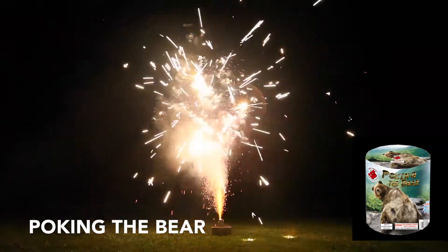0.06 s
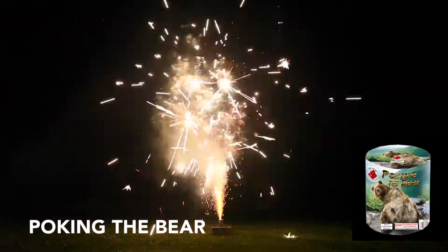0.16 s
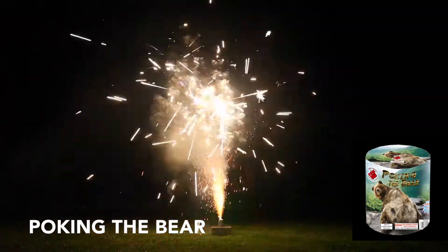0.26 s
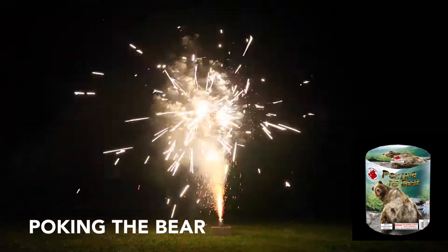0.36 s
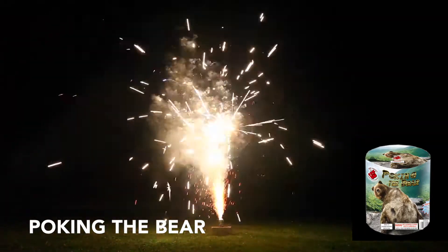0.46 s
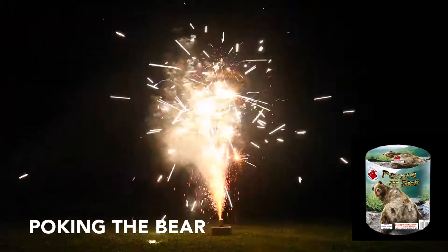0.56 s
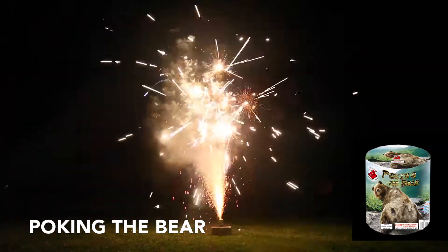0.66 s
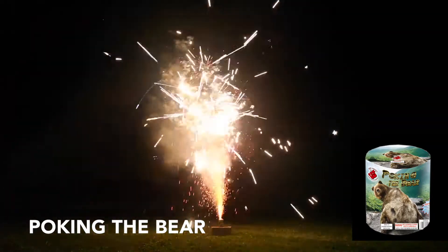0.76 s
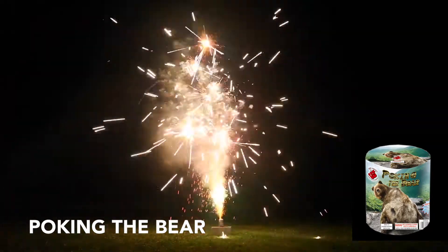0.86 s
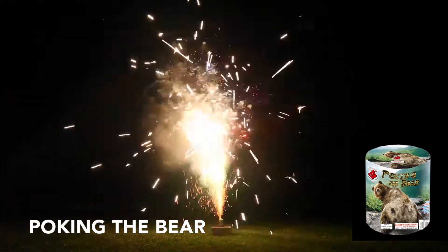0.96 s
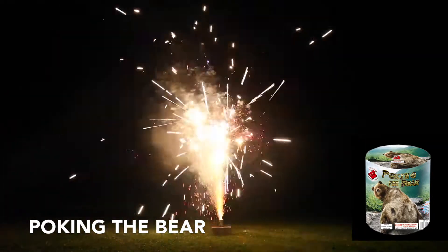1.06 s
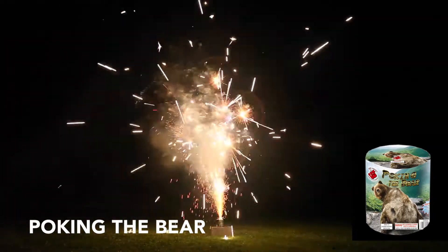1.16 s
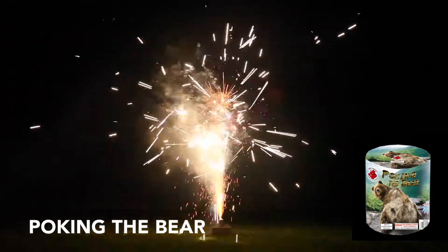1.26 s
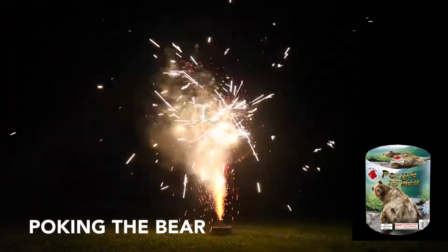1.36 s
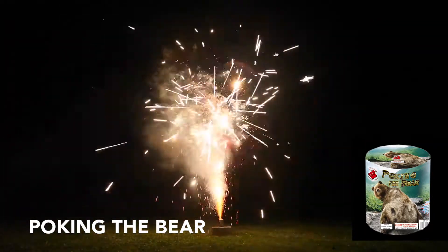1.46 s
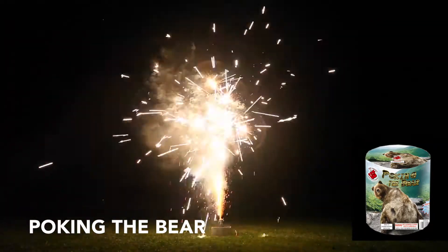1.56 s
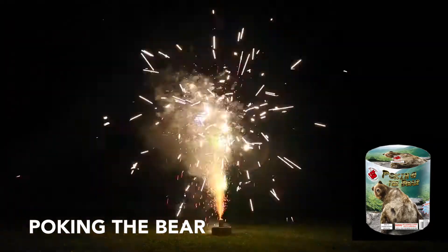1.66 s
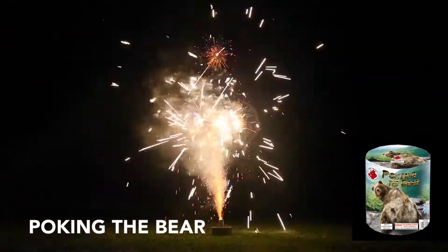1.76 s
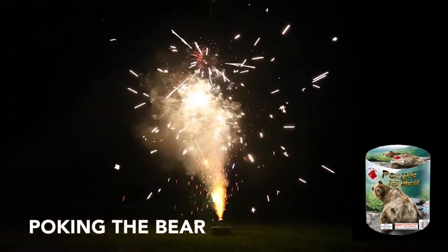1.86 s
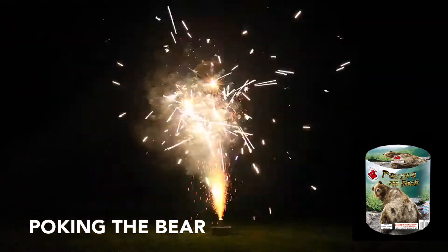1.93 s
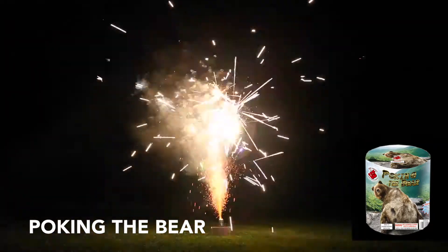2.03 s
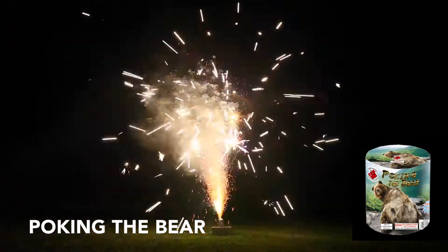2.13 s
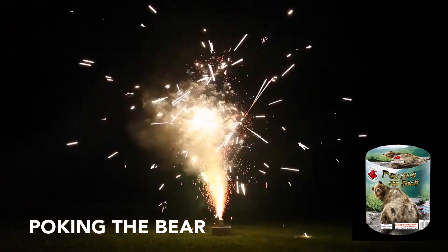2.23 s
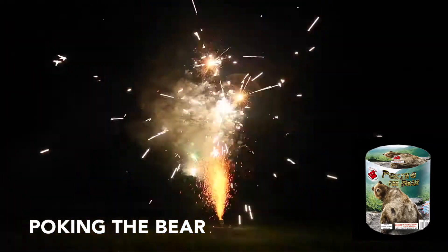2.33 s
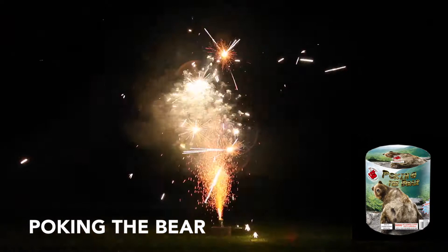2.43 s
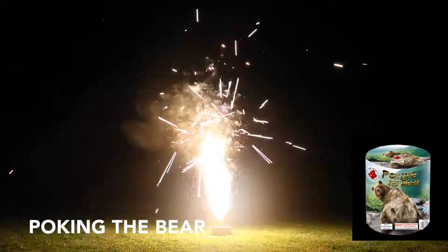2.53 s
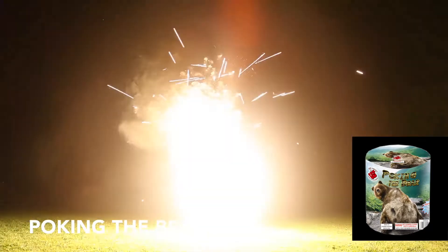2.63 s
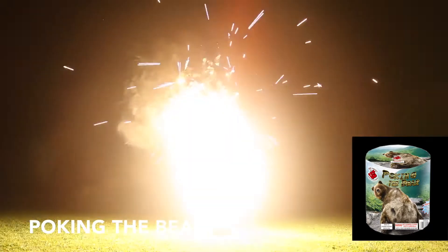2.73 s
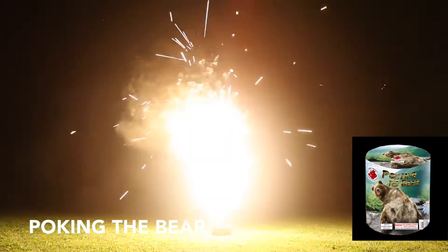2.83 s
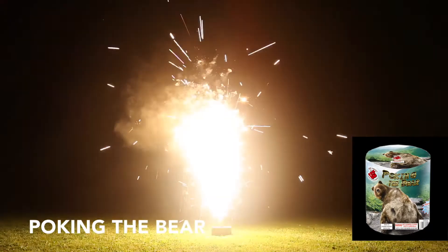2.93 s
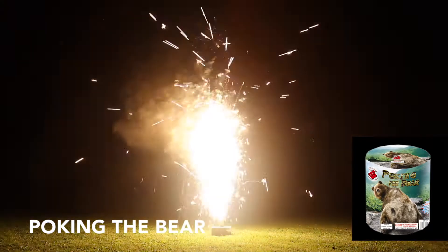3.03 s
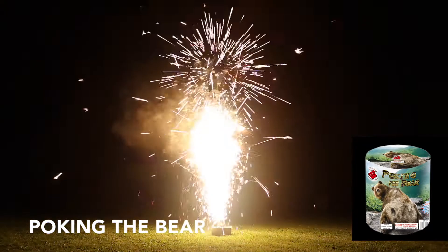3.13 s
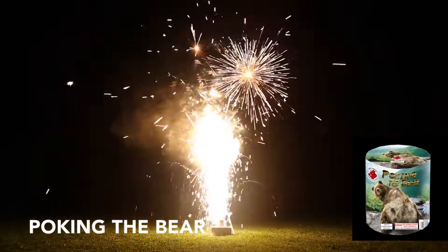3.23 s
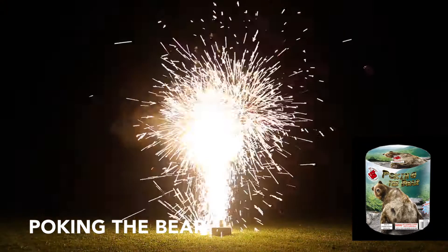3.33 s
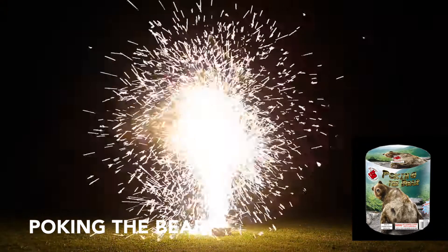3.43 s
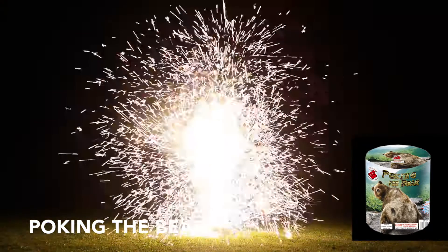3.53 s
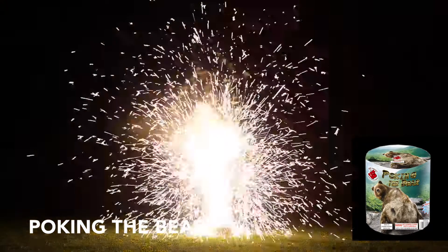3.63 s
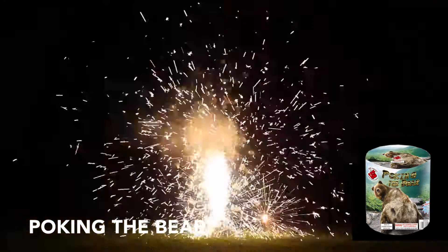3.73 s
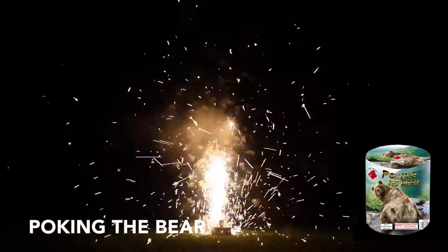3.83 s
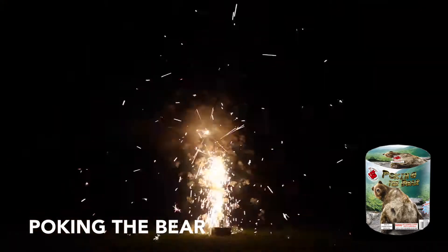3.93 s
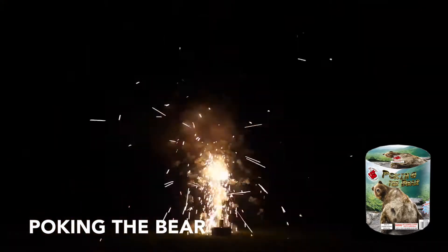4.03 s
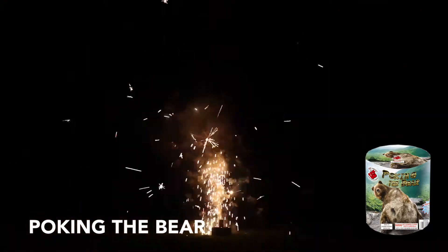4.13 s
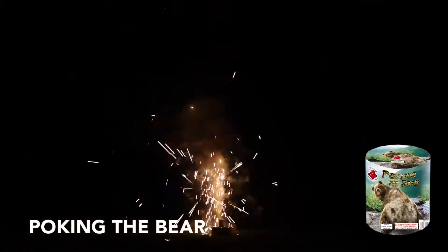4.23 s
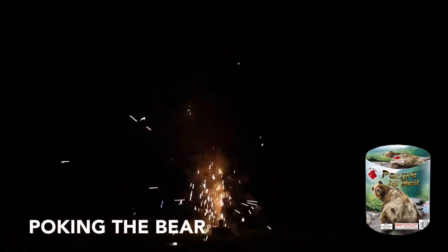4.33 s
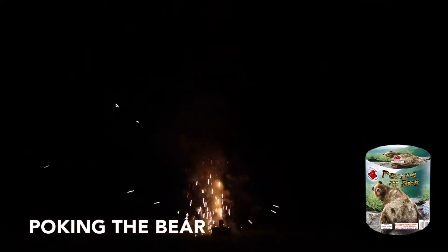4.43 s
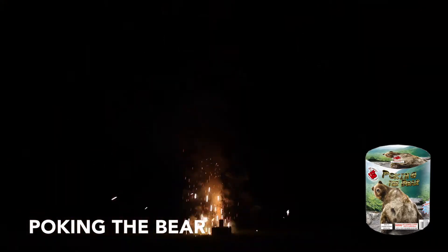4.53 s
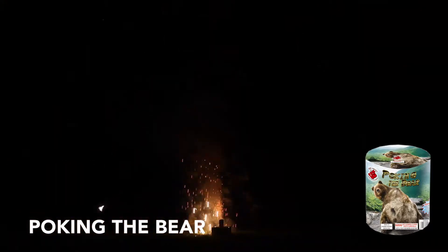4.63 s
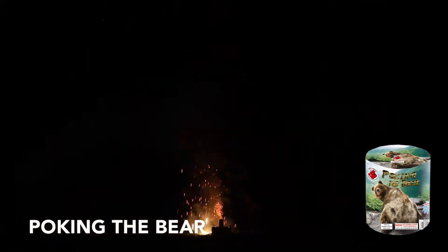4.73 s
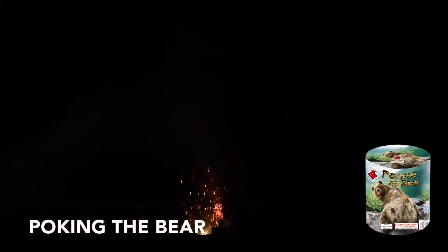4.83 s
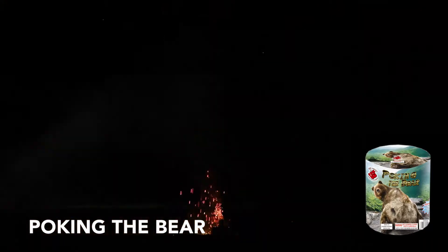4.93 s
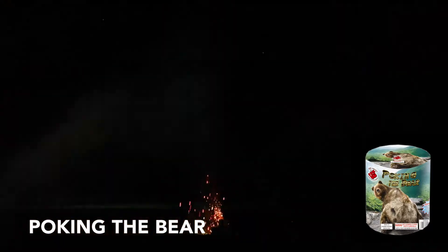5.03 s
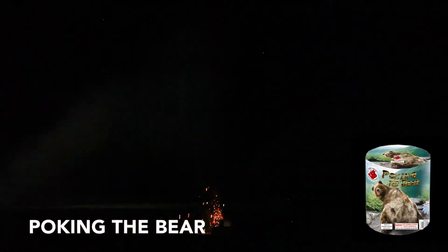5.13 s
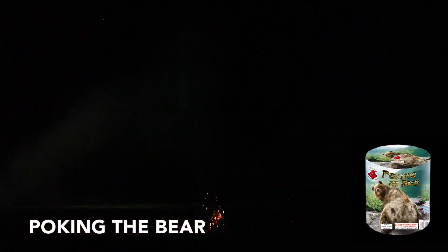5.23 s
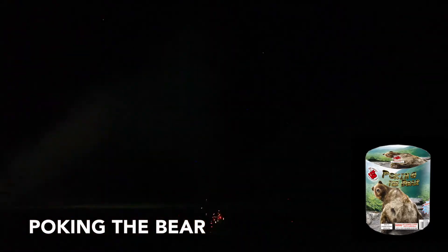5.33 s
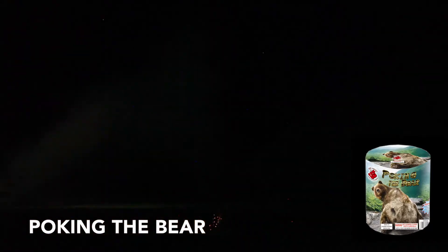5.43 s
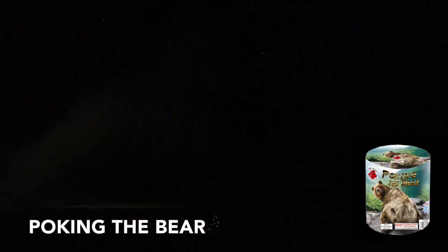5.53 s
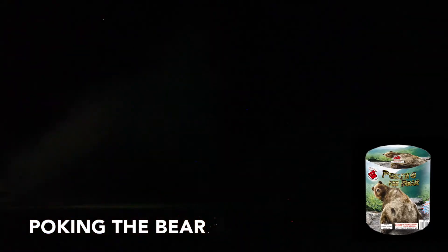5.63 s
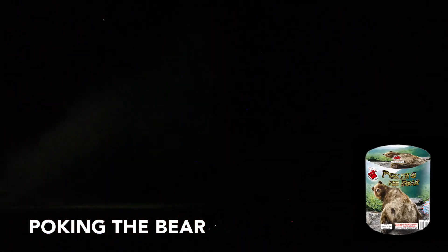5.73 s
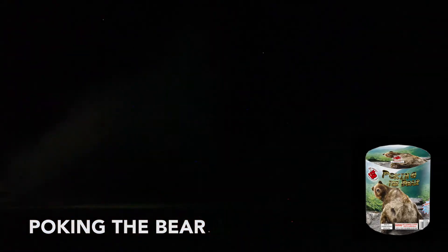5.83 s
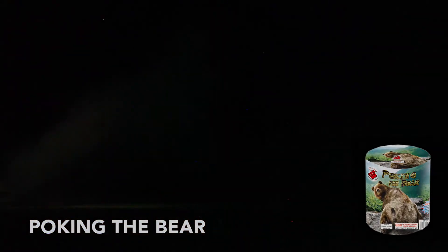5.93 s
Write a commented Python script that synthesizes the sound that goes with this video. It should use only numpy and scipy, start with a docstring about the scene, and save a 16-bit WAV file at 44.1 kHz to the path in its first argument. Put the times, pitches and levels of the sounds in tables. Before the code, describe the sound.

Close, dry crackling from a firework on grass, each crack doubled by a tiny ground bounce and trailed by a dull distant echo. The steady irregular snapping thins slightly, erupts into a dense roaring barrage around three and a half seconds, then sputters and quits. Only the fading echo, faint pops and soft night hush remain, heard on a compressed stereo outdoor microphone.

```python
"""Sharp snaps stand out at once, in quick strings: the stars of a ground fountain firework on a lawn at night.
Each snap is a pulse with a bounce off the ground, a short scattered smear and a long far echo.
Sparks snap between them, burst stars fizz, and the jet hisses and roars as coloured noise.
It flares up with dull puffs and a dense volley, sputters and stops over the faint night hush.
A fast limiter and soft clipping bring the snaps close to one loudness."""
import sys
import numpy as np
from scipy import signal
from scipy.fft import rfft, irfft, next_fast_len
from scipy.io import wavfile
from scipy.ndimage import uniform_filter1d, minimum_filter1d, map_coordinates

SR = 44100
rng = np.random.default_rng(int(sys.argv[2]) if len(sys.argv) > 2 else 0)


def write(x):
    x = np.atleast_2d(x).T
    wavfile.write(sys.argv[1], SR, np.round(np.clip(x, -1, 1) * 32767).astype(np.int16))


N = 264140


def amp(db):
    """Level law: decibels become an amplitude ratio."""
    return 10 ** (np.asarray(db) / 20)


def unit(x):
    """Normalisation: the signal is scaled to rms 1."""
    return x / np.sqrt(np.mean(x ** 2) + 1e-20)


def along(points, hz):
    """Logarithmic frequency scale: (frequency [Hz], value) points are joined by lines on it."""
    f, v = np.transpose(points)
    return np.interp(np.log(hz + 1), np.log(f + 1), v)


def at_times(rows, s):
    """Linear interpolation: (time [s], value) rows are read at the times s."""
    return np.interp(s, *np.transpose(rows))


def curve(rows):
    """Slow envelope: (time [s], value) rows become one value per sample."""
    return at_times(rows, np.arange(N) / SR)


def wobble(rate):
    """Band-limited fluctuation: a smooth curve through random knots, rate of them a second."""
    knots = rng.standard_normal(int(N * rate / SR) + 4)
    return map_coordinates(knots, [np.arange(N) * rate / SR])


def filtered(x, response):
    """Linear filtering: the spectrum is multiplied by a response of frequency."""
    m = next_fast_len(x.shape[-1] + SR // 4)
    spectrum = rfft(x, m) * response(np.fft.rfftfreq(m, 1 / SR))
    return irfft(spectrum, m)[..., :x.shape[-1]]


def convolved(x, response):
    """Superposition: each sample sets off a copy of the impulse response, per channel."""
    return signal.fftconvolve(np.atleast_2d(x), np.atleast_2d(response), axes=1)[:, :N]


def pulse(spectrum, size=2048):
    """Minimum phase: the tightest causal pulse with this spectrum, peak 1."""
    log_gain = np.log(amp(along(spectrum, np.fft.rfftfreq(size, 1 / SR))))
    # folding the cepstrum onto positive times makes the pulse causal
    cepstrum = irfft(log_gain)
    cepstrum[1:size // 2] *= 2
    cepstrum[size // 2 + 1:] = 0
    shape = irfft(np.exp(rfft(cepstrum)))
    return shape / np.abs(shape).max()


def impulses(times, gains):
    """Point events: one spike for each time."""
    samples = np.clip(np.round(times * SR), 0, N).astype(int)
    return np.bincount(samples, gains, N + 1)[:N]


def stereo(pair, width_hz):
    """Spatial coherence: the microphone ports lie close, so they differ mainly above width_hz."""
    side = filtered(pair[1], lambda hz: hz / np.hypot(hz, width_hz))
    return np.array([pair[0] + side, pair[0] - side])


def noise(spectrum, width_hz):
    """Spectral shaping: white noise is coloured, spread to stereo and set to rms 1."""
    coloured = filtered(rng.standard_normal((2, N)), lambda hz: amp(along(spectrum, hz)))
    return unit(stereo(coloured, width_hz))


# strings of crackling stars, lengths up to 2 ms give a lone snap: (start [s], length [s], strength [dB])
STAR_STRINGS = [(0.002, 0.0038, 5), (0.051, 0.022, 2.5), (0.093, 0.0, -3), (0.123, 0.02, -3.5),
                (0.167, 0.059, -5.5), (0.238, 0.0, 1), (0.259, 0.0067, -7.5), (0.281, 0.0081, 2),
                (0.308, 0.0089, -1.5), (0.331, 0.0, 0.5), (0.344, 0.003, 1.5), (0.364, 0.04, -1.5),
                (0.423, 0.0, -6), (0.446, 0.017, -3), (0.496, 0.0, -7), (0.512, 0.0, 1.5),
                (0.529, 0.016, -0.5), (0.558, 0.0053, -1.5), (0.577, 0.043, 2), (0.646, 0.00065, -2),
                (0.682, 0.042, 0.5), (0.739, 0.032, 1.5), (0.793, 0.019, 0.5), (0.837, 0.027, -1.5),
                (0.897, 0.018, 2.5), (0.973, 0.0049, 2), (1.007, 0.0084, 0.5), (1.031, 0.0094, -3),
                (1.071, 0.0074, 0.5), (1.095, 0.013, -2.5), (1.124, 0.026, 0.5), (1.164, 0.0, -7.5),
                (1.192, 0.0077, -4), (1.222, 0.0, 5), (1.238, 0.039, -1), (1.288, 0.024, 1),
                (1.345, 0.00065, -2), (1.369, 0.0091, 3.5), (1.4, 0.0, -4), (1.421, 0.0093, 0.5),
                (1.444, 0.0, 2.5), (1.477, 0.023, 1.5), (1.519, 0.0034, -5), (1.538, 0.087, 1),
                (1.646, 0.02, -0.5), (1.735, 0.022, -1), (1.775, 0.026, -2), (1.814, 0.002, 1),
                (1.829, 0.017, 0.5), (1.89, 0.0022, -10.5), (1.922, 0.0078, -2.5), (1.957, 0.0099, 1.5),
                (1.986, 0.00055, 0), (2.002, 0.0012, -13), (2.022, 0.0018, -10.5), (2.033, 0.0, 2),
                (2.051, 0.037, -3.5), (2.109, 0.019, 1.5), (2.172, 0.0, 0.5), (2.198, 0.0, -13.5),
                (2.22, 0.0077, 1), (2.243, 0.0041, -2), (2.268, 0.00086, -3), (2.302, 0.034, -4),
                (2.371, 0.0084, 0), (2.433, 0.00032, -3.5), (2.471, 0.036, -3.5), (2.538, 0.0013, -9),
                (2.556, 0.012, 2.5), (2.587, 0.0016, -4), (2.6, 0.005, -0.5), (2.621, 0.00069, -8.5),
                (2.633, 0.02, 0), (2.689, 0.00032, 4), (2.721, 0.021, 0.5), (2.786, 0.0, 2),
                (2.856, 0.0042, -3.5), (2.904, 0.017, -1), (2.942, 0.008, -5), (2.965, 0.00013, -1),
                (3.0, 0.0, -1), (3.025, 0.0068, -2.5), (3.049, 0.0, -2.5), (3.066, 0.0027, -5.5),
                (3.088, 0.0, -4.5), (3.101, 0.0, 0), (3.114, 0.0076, -14), (3.132, 0.047, 0),
                (3.2, 0.0016, -18), (3.227, 0.0, -3.5), (3.244, 0.0056, 1.5), (3.273, 0.0044, 3),
                (3.295, 0.0049, -1.5), (3.729, 0.0069, 7), (3.772, 0.012, 5.5), (3.808, 0.018, -4.5),
                (3.837, 0.02, -1), (3.884, 0.0, 6), (3.916, 0.00056, -1.5), (3.968, 0.0039, -6),
                (3.988, 0.0, 0), (4.01, 0.0029, -6), (4.035, 0.0, 5), (4.083, 0.00027, -5),
                (4.103, 0.0, -2), (4.173, 0.0, -1), (4.205, 0.0, -3.5), (4.224, 0.00073, -6),
                (4.264, 0.0064, -2), (4.284, 0.0, -6.5), (4.325, 0.00014, -3.5), (4.428, 0.00078, -24),
                (4.462, 0.0045, -34.5), (4.513, 0.0034, -33), (4.629, 0.0018, -24), (4.968, 0.001, -26.5)]
# within a string: snaps a second, unevenness as a share of the spacing, spread of strength
STRING_RATE, STRING_JITTER, STRING_SPREAD_DB = 125, 0.35, 3


def strings(count=16):
    """Jittered pulse train: a string has a snap at each end and unevenly spaced ones between."""
    snaps = []
    for start, length, db in STAR_STRINGS:
        gaps = min(int(np.ceil(length * STRING_RATE - 1 / 4)), count - 1)
        k = np.arange(gaps + 1)
        slip, size = rng.standard_normal((2, count))[:, k]
        inside = (k > 0) & (k < gaps)
        position = (k + STRING_JITTER * slip * inside) / max(gaps, 1)
        strength_db = db + STRING_SPREAD_DB * size * (gaps > 0)
        snaps.append([start + length * position, strength_db])
    return np.hstack(snaps)


def with_bounce(times, gains, bounce_ms):
    """Ground reflection: each snap comes straight and once more off the lawn, which swallows its treble."""
    bounce = impulses(times + bounce_ms / 1000, gains)
    return impulses(times, gains) + filtered(bounce, lambda hz: .42 / (1 + 1j * hz / 3200))


# median bulk of the stars, their low body against their edge: (time [s], bulk [dB])
STAR_BULK = [(0, -20.5), (3.15, -15), (3.4, -5), (3.86, -9.5), (4, -15.5), (4.45, -11)]


def stars(s, db, bounce_ms, boom_hz=900, variety_db=5):
    """Source size: a bulkier star pushes longer, with more low body and less edge."""
    bulk = amp(at_times(STAR_BULK, s) + variety_db * rng.standard_normal(len(s)))
    edge_gain = amp(db) / np.hypot(1, bulk)
    edge = with_bounce(s, edge_gain, bounce_ms)
    push = with_bounce(s, 2 * bulk * edge_gain, bounce_ms)
    return edge + filtered(push, lambda hz: 1 / (1 + 1j * hz / boom_hz))


# small sparks, none after the last row: (time [s], rate [snaps/s])
SPARK_RATE = [(0, 43), (2.4, 25.2), (3.15, 42), (3.35, 350), (3.55, 553), (3.68, 297), (3.78, 40),
              (4.3, 4.7)]


def sparks(level_db=-29, spread_db=4, crowd_db=5):
    """Random arrivals: small sparks snap at chance times and heights, harder when they come in crowds."""
    rate = curve(SPARK_RATE) * (np.arange(N) / SR < SPARK_RATE[-1][0])
    born = np.flatnonzero(rng.random(N) < rate / SR)
    size, height = rng.standard_normal((len(born), 2)).T
    db = level_db + spread_db * size + crowd_db * np.log1p(rate[born] / 100)
    bounce_ms = np.abs(1.7 + 0.27 * height)
    return with_bounce(born / SR, amp(db), bounce_ms)


def scattered(snaps, near_db=-16, near_t60=0.027, yard_db=-21, yard_t60=0.076, count=8):
    """Scattering: nearby things add one of several smears, drawn at random for each short stretch of time."""
    t = np.arange(SR // 5) / SR
    near = amp(near_db) * unit(amp(-60 * t / near_t60))
    yard = amp(yard_db) * unit(amp(-60 * t / yard_t60))
    # each stretch of 256 samples draws its smear
    choice = rng.integers(count, size=N // 256 + 1).repeat(256)[:N]
    smear = np.zeros((2, N))
    for k in range(count):
        grain = unit(stereo(rng.standard_normal((2, len(t))), width_hz=6000))
        tail = grain * (near + yard) / np.sqrt(len(t))
        smear += convolved(snaps * (choice == k), tail)
    return smear


# relative answer of the surroundings: (delay [s], level [dB])
ECHO_DECAY = [(0, 2), (.08, 2), (.2, 6.5), (.45, -8), (.8, -13.5), (1.25, -4.5), (1.45, -12.5), (1.8, -16),
              (2.1, -23.5), (2.4, -18), (2.8, -20.5)]
# what grass and air leave of a far echo: (frequency [Hz], gain [dB])
ECHO_COLOUR = [(60, -1), (210, 5), (370, -17.5), (600, -10), (1100, -2), (2200, -12), (2900, -14),
               (4500, -14), (12000, -9)]


def far_echo(snaps, level_db=-24, air_hz=3700, air_s=0.23, roll_db=1.16):
    """Reverberation with air absorption: distant trees and walls return a dull, rolling wash for seconds."""
    t = np.arange(3 * SR) / SR
    tail = stereo(rng.standard_normal((2, len(t))), width_hz=410) * amp(at_times(ECHO_DECAY, t))
    tail /= np.linalg.norm(tail[0])
    # the longer the path, the more treble the air takes
    dull = filtered(tail, lambda hz: 1 / (1 + (hz / air_hz) ** 4))
    tail = dull + (tail - dull) * np.exp(-t / air_s)
    roll = amp(level_db + roll_db * wobble(12))
    return roll * convolved(snaps, filtered(tail, lambda hz: amp(along(ECHO_COLOUR, hz))))


# a snap's relative spectrum at each microphone port: (frequency [Hz], level [dB])
LEFT_SNAP = [(40, -57), (220, -20.5), (330, -14), (500, -6.5), (1200, 0), (2300, 3), (3300, 2), (4300, 0),
             (5300, -16), (6300, -3.5), (7500, -8.5), (15000, -24.5)]
RIGHT_SNAP = [(40, -65), (220, -22.5), (330, -6), (500, -3), (1400, 3), (2800, 4), (3800, 5.5), (5000, 6.5),
              (6200, 0.5), (7200, -20), (11000, -9.5), (15000, -43)]


def crackle(s, db, bounce_ms, level_db=1, lag_ms=0.031):
    """Port resonance: snaps and echoes ring briefly in two microphone ports, the left a little later."""
    snaps = stars(s, db, bounce_ms) + sparks()
    air = snaps + scattered(snaps) + far_echo(snaps)
    left, right = convolved(air, [pulse(LEFT_SNAP), pulse(RIGHT_SNAP)])
    left = filtered(left, lambda hz: np.exp(-2j * np.pi * hz * lag_ms / 1000))
    return amp(level_db) * np.array([left, right])


# relative spectrum of the sizzle: (frequency [Hz], density [dB per Hz])
FIZZ_COLOUR = [(1500, -19.5), (6000, 5), (9000, 3), (15000, -9)]


def fizz(s, db, level_db=-35, t60=0.059, grain_db=3):
    """Incoherent addition: each burst star's tiny sparks add power and die away; a weak one throws hardly any."""
    t = np.arange(SR // 4) / SR
    thrown = np.tanh(amp(db) ** 2) * amp(db)
    power = convolved(impulses(s, thrown), amp(-60 * t / t60) ** 2)
    grain = amp(level_db + grain_db * wobble(1000))
    return grain * np.sqrt(np.abs(power)) * noise(FIZZ_COLOUR, width_hz=15000)


# hiss of the burning jet, before flutter: (time [s], level [dB])
JET_HISS = [(0, -46), (1.5, -44.5), (2.5, -47), (3.2, -48.5), (3.5, -40), (3.7, -41.5), (3.95, -46.5),
            (4.3, -50.5), (4.8, -81)]
# roar of the turbulent flame, before flutter: (time [s], level [dB])
FLAME_ROAR = [(0, -57), (1.6, -57.5), (2.4, -63), (3.1, -54), (3.3, -52.5), (3.5, -38.5), (3.66, -36),
              (3.75, -44), (3.9, -53), (4.3, -68), (4.6, -86)]
# relative spectra of hiss and roar: (frequency [Hz], density [dB per Hz])
HISS_COLOUR = [(100, -16.5), (1000, -16.5), (3000, -3.5), (5500, -2.5), (15000, -22.5)]
ROAR_COLOUR = [(25, -10.5), (75, 4.5), (170, -2), (350, -9.5), (700, -18), (1500, -2), (4000, -40.5)]


def jet():
    """Turbulence noise: gas hisses from the nozzle and the flame roars, sharing one flutter."""
    flutter_db = wobble(27)
    hiss = amp(curve(JET_HISS) + flutter_db) * noise(HISS_COLOUR, width_hz=1000)
    roar_db = curve(FLAME_ROAR) + flutter_db + 5.0 * wobble(54)
    return hiss + amp(roar_db) * noise(ROAR_COLOUR, width_hz=1700)


# relative spectrum of the night hush: (frequency [Hz], density [dB per Hz])
NIGHT_COLOUR = [(15, -56), (25, -18.5), (80, -1.5), (157, -11), (212, -5), (405, -26), (476, -12),
                (531, -9.5), (1260, -6.5), (5730, -43), (13600, -34), (16000, -42)]


def night(level_db=-67):
    """Background noise: a faint, steady hush of coloured noise."""
    return amp(level_db) * noise(NIGHT_COLOUR, width_hz=200)


# dull puffs of burning powder: (time [s], relative peak level [dB])
POWDER_PUFFS = [(1.615, -39), (3.399, -22), (3.448, -20), (3.514, -17.5), (3.614, -14), (3.662, -11.5),
                (3.807, -21.5), (3.824, -16), (3.85, -16), (4.427, -44), (4.512, -51), (4.628, -51),
                (4.967, -47.5)]
# relative spectrum of one puff: (frequency [Hz], level [dB])
PUFF_COLOUR = [(25, -35), (90, -17.5), (160, -3), (240, 3.5), (400, 0.5), (800, -17), (2500, -33.5)]


def puffs(level_db=1):
    """Impulsive source: each puff of burning powder is one low, causal pulse."""
    s, db = np.transpose(POWDER_PUFFS)
    return convolved(impulses(s, amp(db + level_db)), pulse(PUFF_COLOUR))


# the dense volley: (time [s], mean rate [stars/s], median strength [dB])
DENSE_VOLLEY = [(3.326, 236, 1), (3.38, 185, 1.5), (3.47, 224, 5.5), (3.55, 290, 9), (3.597, 140, 0.5),
                (3.615, 244, 8), (3.67, 236, 6.5), (3.708, 106, 1.5)]
VOLLEY_SPREAD_DB = 6
# stars fire in short irregular clumps: clumps a second, share of the time spent firing
CLUMP_RATE, CLUMP_SHARE = 75, 0.72


def volley(count=200):
    """Clustered arrivals: many stars of very unequal strength snap close together, with brief lulls."""
    s, rate, db = np.transpose(DENSE_VOLLEY)
    t = np.arange(N) / SR
    cycle = (t - s[0]) * CLUMP_RATE + wobble(CLUMP_RATE / 2) / 3
    firing = cycle % 1 < CLUMP_SHARE
    # running count of stars spent, the firing times making up for the lulls
    rate_now = firing * np.interp(t, s, rate, left=0, right=0)
    spent = np.cumsum(rate_now) / SR / CLUMP_SHARE
    slip, size = rng.standard_normal((2, count))
    turn = np.abs(np.arange(count) + slip / 2)
    fired = turn < spent[-1]
    times = t[np.searchsorted(spent, turn[fired])]
    return np.array([times, np.interp(times, s, db) + VOLLEY_SPREAD_DB * size[fired]])


# the higher the stars burst, the later their bounce off the lawn: (time [s], median delay [ms])
BOUNCE_DELAY = [(0, 1.89), (1.4, 1.58), (2.3, 1.885), (3.3, 1.81), (3.55, 1.13), (3.8, 1.535), (4.03, 1.2),
                (4.1, 0.78), (5, 0.63)]
BOUNCE_SPREAD = 0.18  # from star to star, as a share of the delay


def bursts():
    """Path difference: every star has a time, a strength and a ground-bounce delay that grows with height."""
    s, db = np.hstack([strings(), volley()])
    height = np.exp(BOUNCE_SPREAD * rng.standard_normal(len(s)))
    return s, db, height * at_times(BOUNCE_DELAY, s)


def scene():
    """Superposition: crackle, fizz, jet and puffs add to the hush of the night."""
    s, db, bounce_ms = bursts()
    return crackle(s, db, bounce_ms) + fizz(s, db) + jet() + puffs() + night()


def record(dry, ceiling_db=-2, clip_db=-7.8, low_cut_hz=90, top_hz=16400, size=13):
    """Dynamic compression: a fast limiter ducks each snap, tips clip softly, both band ends are cut."""
    needed = np.minimum(1, amp(ceiling_db) / (np.abs(dry) + 1e-9))
    # the gain is held and then smoothed, each over size samples centred on the present one
    limited = dry * uniform_filter1d(minimum_filter1d(needed, size), size)
    clipped = limited / (1 + (limited / amp(clip_db)) ** 4) ** (1 / 4)
    balanced = clipped * amp([[.15], [0]])  # left, right [dB]
    thinned = filtered(balanced, lambda hz: 1j * hz / (1j * hz + low_cut_hz))
    return filtered(thinned, lambda hz: 1 / (1 + (hz / top_hz) ** 120))


dry = scene()
out = record(dry)
write(out)
```